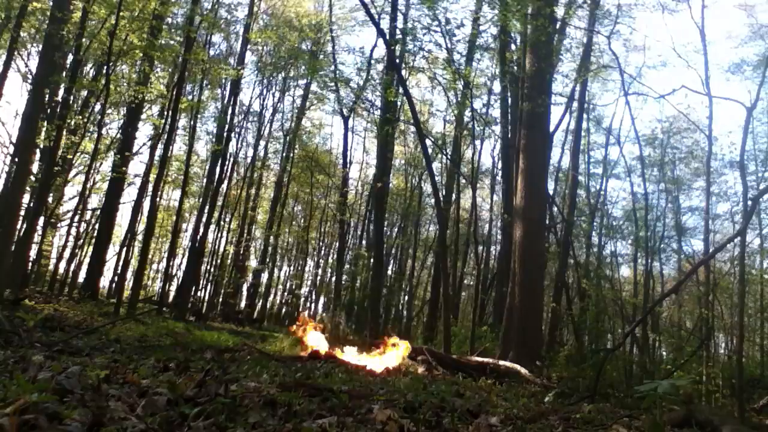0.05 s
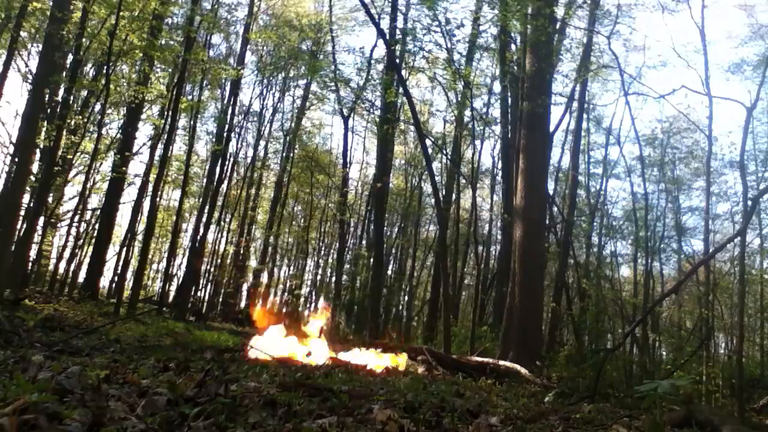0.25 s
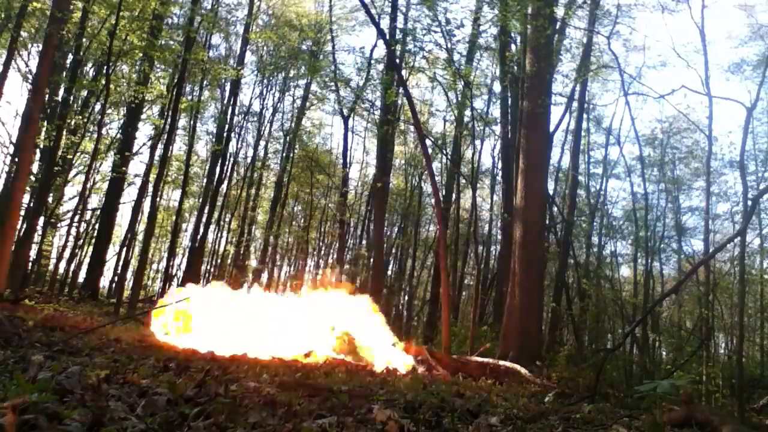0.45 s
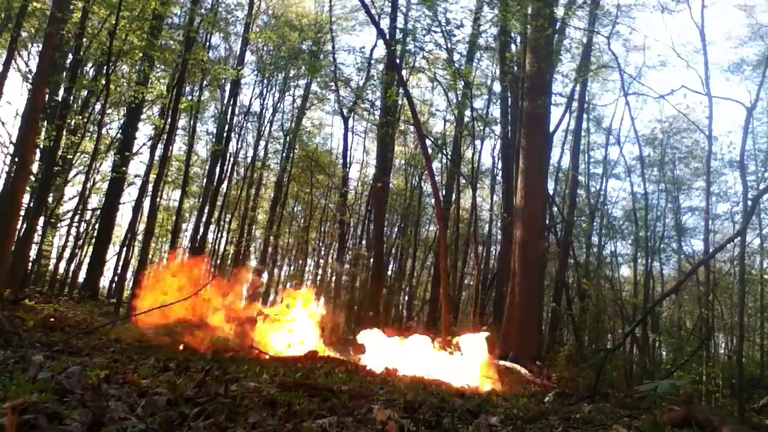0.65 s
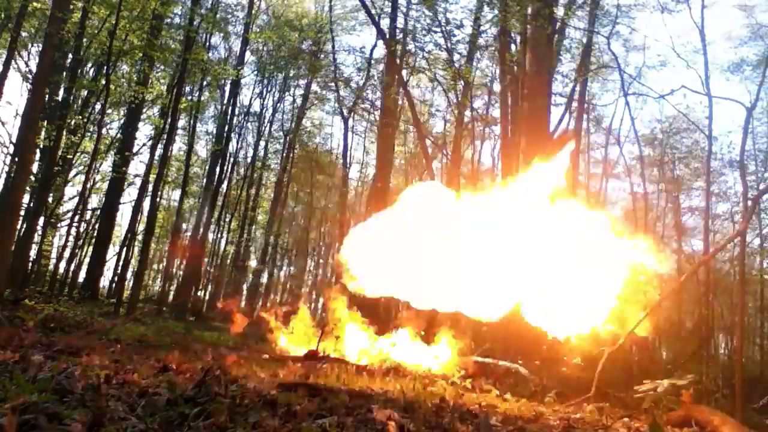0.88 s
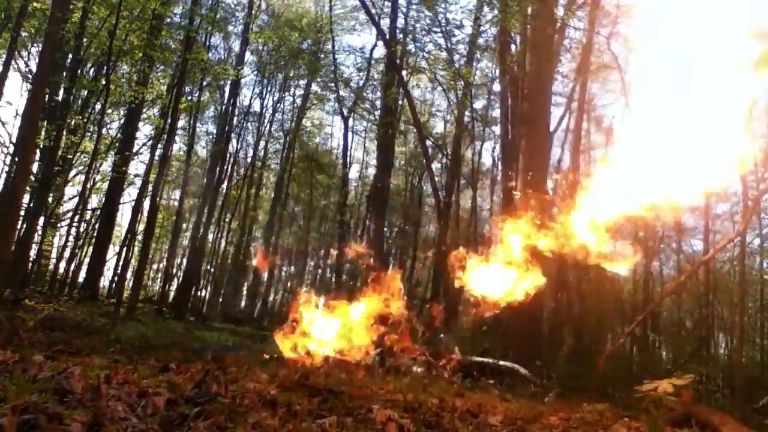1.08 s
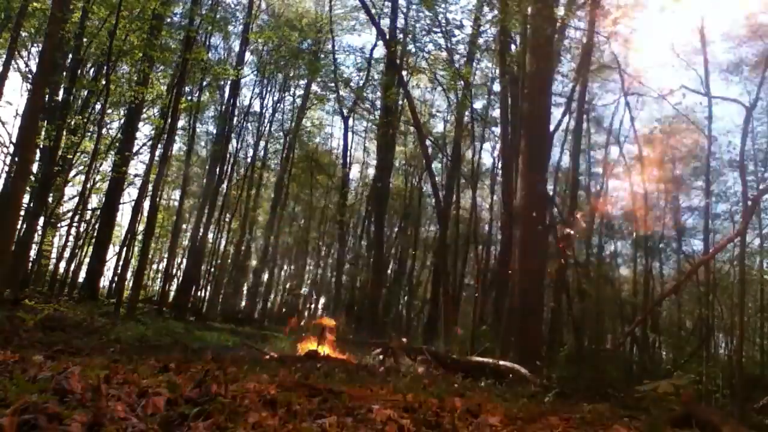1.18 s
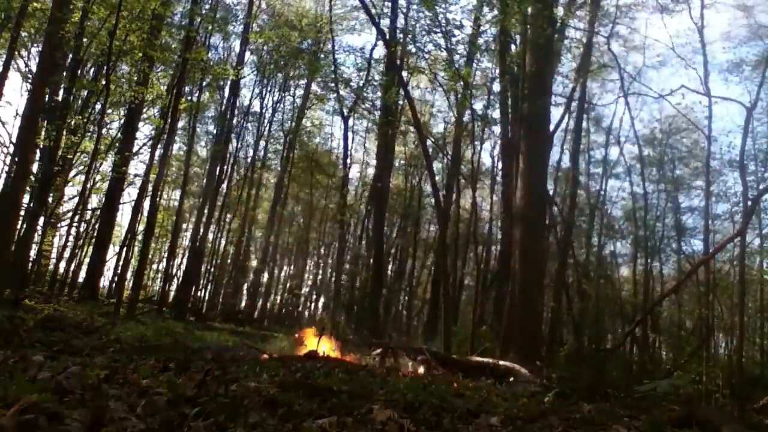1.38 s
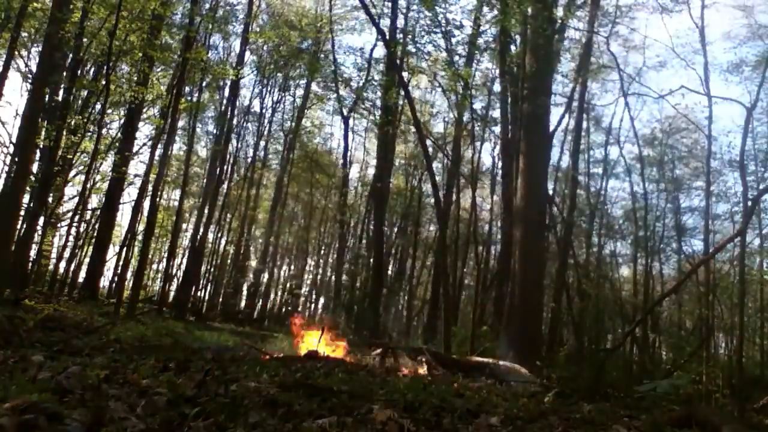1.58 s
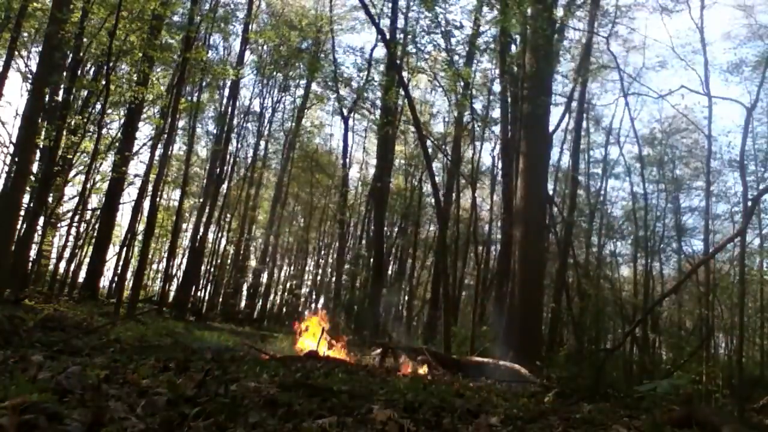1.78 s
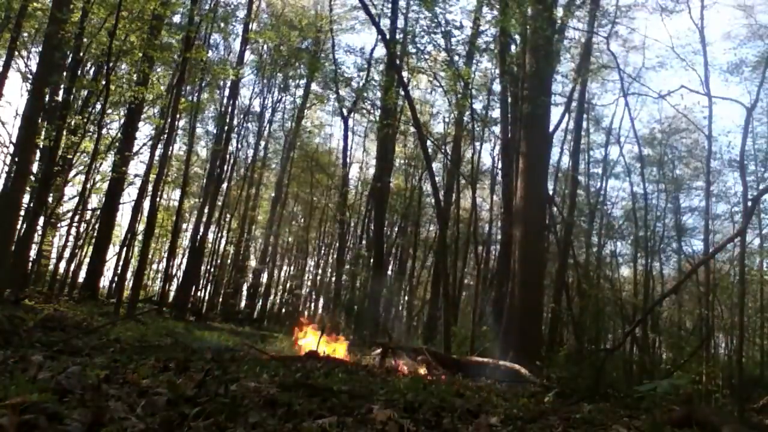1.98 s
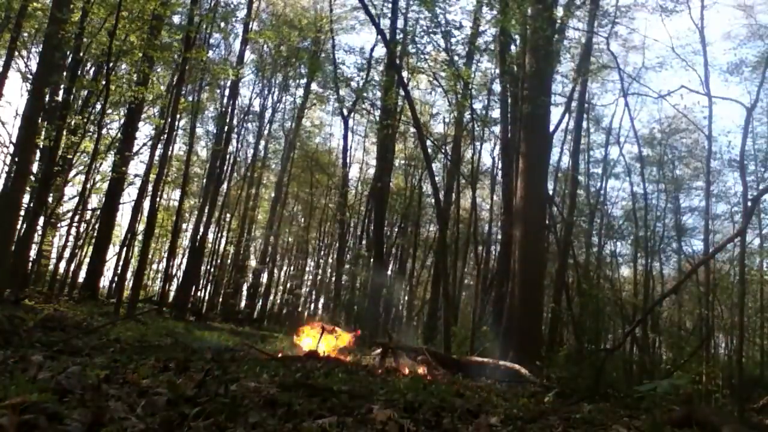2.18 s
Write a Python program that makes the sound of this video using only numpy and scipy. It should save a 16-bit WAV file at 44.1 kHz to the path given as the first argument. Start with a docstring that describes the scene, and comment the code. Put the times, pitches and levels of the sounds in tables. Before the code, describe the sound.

A spray can bursts with a sharp bang at 0.3 seconds, after a faint fire murmur and a few spits. Gas hisses out and ignites in low, thumping surges, swelling into a roaring fireball with a breathy whistle around 1.1 seconds. The flame stops abruptly near 1.4 seconds. Unlit gas keeps hissing in swells, then weakens as the can knocks dully on the forest floor at about 2.1 seconds.

```python
"""A small fire murmurs in a wood, and the aerosol can lying in it hisses and spits at the seam.
The can splits with a sharp bang. Its gas jets out and ignites in thumping surges that swell into
a roaring fireball and go out abruptly. The tumbling can blows off the rest of its gas unlit and
knocks down on the forest floor. Every source is coloured noise shaped by level curves or short puffs."""
import sys
import numpy as np
from scipy import signal
from scipy.fft import rfft, irfft
from scipy.io import wavfile
from scipy.ndimage import uniform_filter1d, map_coordinates

SR = 44100
rng = np.random.default_rng(int(sys.argv[2]) if len(sys.argv) > 2 else 0)


def dump(signal):
    """Clip the signal to [-1, 1] and save it as 16-bit WAV at the path in sys.argv[1]."""
    limited = np.clip(np.atleast_2d(signal).T, -1, 1)
    pcm = np.round(limited * 32767).astype(np.int16)
    wavfile.write(sys.argv[1], SR, pcm)


N = 99225
T = np.arange(N) / SR

# first spits at the seam: start_s, level_db, decay_s
SEAM_SPITS = [(0.2156, -13, 0.0022), (0.2218, -21, 0.005), (0.229, -28, .002)]
# snaps on top of the spits: start_s, level_db
SEAM_SNAPS = [(0.217, -17), (0.2305, -15)]
# tone of the leak, spits, snaps and bang: pitch_hz, gain_db
LEAK_EQ = [(3000, -23), (7000, 1), (9500, -4), (12000, 0), (14000, -1), (16000, -5)]
SPIT_EQ = [(1200, -35), (4000, -20.5), (5400, -9), (6300, -9), (7400, 4.5), (9000, -8), (11500, -11),
           (16000, -15)]
SNAP_EQ = [(3000, -18), (6000, 0), (16000, 0)]
BANG_EQ = [(150, -4), (350, -4), (550, 8), (1000, -5.5), (1400, -21), (3000, -6), (5000, -3.5), (7500, 1),
           (11000, -2), (14200, -11), (16000, -11)]
BURST_S = 0.2725

def rupture():
    """The seam leaks thinly and spits, then tears open with a crackling bang."""
    leak = from_db(-46.5) * (T < BURST_S) * noise(LEAK_EQ)
    spits = sum(from_db(db) * puff(start, .0006, .001, decay) for start, db, decay in SEAM_SPITS)
    spits *= evened(noise(SPIT_EQ), .002)
    bang = from_db(-12) * puff(BURST_S, attack_s=.0014, hold_s=.012, decay_s=.011)
    bang *= noise(BANG_EQ) * turbulence(520, 1.7)
    snaps = sum(from_db(db) * puff(start, .0001, .00027, .0005) for start, db in SEAM_SNAPS)
    snaps *= evened(noise(SNAP_EQ), .001)
    return leak + spits + snaps + bang


# faders for the roar and the flame tongues: time_s, level_db
ROAR_LEVEL = [(0, -28), (.086, -40.5), (.146, -31), (.275, -39), (.29, -28), (.3, -9.5), (.325, -17.5),
              (.355, -16.5), (.4, -28.5), (.456, -39), (.53, -19.5), (.556, -18.5), (.608, -10),
              (.638, -13.5), (.69, -30.5), (.755, -34), (.773, -20.5), (.8, -16), (.858, -9.5),
              (.905, -16.5), (.962, -9), (1.0, -13.5), (1.03, -13.5), (1.08, -23), (1.122, -10.5),
              (1.295, -13.5), (1.33, -24), (1.382, -8.5), (1.4, -18), (1.412, -28), (1.47, -36.5),
              (1.55, -83)]
FLUTTER_LEVEL = [(0, -33.5), (.238, -30.5), (.272, -43), (.286, -21.5), (.298, -13.5), (.32, -22.5),
                 (.352, -21), (.402, -35), (.5, -27.5), (.585, -17), (.67, -29.5), (.72, -25.5),
                 (.764, -28), (.82, -15.5), (.865, -29), (.96, -27.5), (1.05, -32.5), (1.26, -29),
                 (1.398, -30), (1.418, -45), (1.5, -87)]
# the roar deepens as the fireball grows: time_s, pitch_hz
ROAR_GLIDE = [(0, 190), (.3, 169.5), (.45, 192.8), (.55, 135.5), (.64, 169.8), (.78, 154.7), (1.0, 171.2),
              (1.2, 144.3), (1.38, 117.6), (1.5, 140)]
# tone of the roar, flutter and rumble: pitch_hz, gain_db
ROAR_EQ = [(25, -23), (45, -22.5), (75, -4), (150, 2), (240, 1), (330, -8.5), (480, -23.5), (900, -47),
           (1300, -73)]
FLUTTER_EQ = [(100, -20), (250, -8.5), (400, -0.5), (600, -4.5), (850, -9.5), (1060, -16), (1250, -37),
              (2000, -70)]
RUMBLE_EQ = [(25, -52), (60, -29), (100, -9), (150, 0), (200, -11), (280, -21), (450, -27), (1000, -29.5)]
RUMBLE_POWER_DECAY_S = 0.17

def flame():
    """Burning gas billows and flutters, leaving a low rumble to die away among the trees."""
    drive = from_db(curve(ROAR_LEVEL))
    roar = drive * evened(gliding_noise(ROAR_EQ, ROAR_GLIDE), .038)
    flutter = from_db(curve(FLUTTER_LEVEL)) * evened(noise(FLUTTER_EQ), .037)
    pole = np.exp(-1 / (RUMBLE_POWER_DECAY_S * SR))
    tail = np.sqrt(signal.lfilter([1 - pole], [1, -pole], drive ** 2))
    rumble = from_db(-20.5) * tail * evened(noise(RUMBLE_EQ), .071)
    return roar + flutter + rumble


# bass hits under the flame: start_s, level_db, decay_s
IGNITION_THUMPS = [(0.289, -17.5, 0.012), (.545, -12.5, 0.012), (0.764, -15.5, 0.0097),
                   (0.896, -20, 0.0084), (1.36, -17, 0.016)]
# their tone: pitch_hz, gain_db
THUMP_EQ = [(20, -31), (45, -17), (75, 2), (110, 5.5), (170, -3), (300, -53)]

def ignitions():
    """Each fresh cloud of gas catches with a low thump."""
    swell = sum(from_db(db) * puff(start, .007, .0095, decay) for start, db, decay in IGNITION_THUMPS)
    return swell * evened(noise(THUMP_EQ), .021)


# the hiss swells whenever the nozzle turns this way: time_s, level_db (before trim)
HISS_LEVEL = [(0, -39.5), (.08, -45.5), (.2, -39.5), (.268, -41.5), (.3, -25.5), (.36, -29.5), (.41, -33),
              (.48, -35.5), (.525, -32.5), (.545, -26), (.62, -30), (.69, -34.5), (.76, -25), (.89, -23.5),
              (.91, -26), (.945, -24), (.97, -39.5), (1.02, -37), (1.032, -25.5), (1.052, -18.5),
              (1.13, -28), (1.2, -27), (1.27, -32), (1.315, -37), (1.35, -39), (1.44, -37.5), (1.6, -57)]
# whistle accents: start_s, attack_s, hold_s, level_db
JET_WHISTLES = [(0.736, .015, 0.017, -27), (.81, .025, 0.04, -26), (1.172, .07, 0.078, -23)]
# glide shared by hiss and whistle: time_s, pitch_hz
JET_GLIDE = [(0, 7995), (.55, 8210), (.76, 8490), (.86, 7490), (.94, 6893), (1.02, 8440), (1.06, 7523),
             (1.21, 8900), (1.32, 7630), (1.5, 7710)]
# tone of each: pitch_hz, gain_db
HISS_EQ = [(900, -37), (1500, -14), (3000, -11.5), (4300, -6.5), (5500, -6), (7000, -1.5), (8200, 0),
           (10000, -3.5), (12500, -11.5), (16000, -18.5)]
WHISTLE_EQ = [(5200, -28), (6400, -6.5), (7300, -2), (8200, -0.5), (9300, -4.5), (10500, -11.5),
              (12500, -20), (16000, -22)]

def jet(trim_db=0.5):
    """Gas hisses through the tear and at its strongest narrows to a breathy whistle."""
    hiss = from_db(curve(HISS_LEVEL) + trim_db) * gliding_noise(HISS_EQ, JET_GLIDE)
    hiss *= turbulence(80, .89)
    swell = sum(from_db(db) * puff(start, attack, hold, .012) for start, attack, hold, db in JET_WHISTLES)
    return hiss + swell * gliding_noise(WHISTLE_EQ, JET_GLIDE)


# fader for the midrange rush: time_s, level_db (before trim)
RUSH_LEVEL = [(0, -52), (.268, -52), (.285, -31), (.4, -42.5), (.48, -42.5), (.56, -40), (.68, -48),
              (.78, -37.5), (.86, -30.5), (.95, -27), (1.02, -32.5), (1.08, -21), (1.15, -23.5),
              (1.26, -23), (1.35, -27), (1.41, -40.5), (1.55, -41.5)]
# it deepens as the plume spreads: time_s, pitch_hz
RUSH_GLIDE = [(.3, 1699), (.8, 2098), (.95, 1646), (1.08, 1495), (1.2, 1184), (1.38, 1047)]
# its tone: pitch_hz, gain_db
RUSH_EQ = [(400, -13.5), (800, -0.5), (1150, 0), (1400, 0), (1800, -1), (2400, -3.5), (3100, -8.5),
           (4300, -6.5), (5600, -14), (12000, -24)]

def plume(trim_db=-2.5):
    """The plume rushes, flickering as eddies tear at it."""
    rush = from_db(curve(RUSH_LEVEL) + trim_db) * gliding_noise(RUSH_EQ, RUSH_GLIDE)
    return rush * turbulence(rate_hz=68.6, depth_db=2)


# the ground reflection arrives ever later: time_s, delay_ms
BOUNCE_LAG = [(.8, 0.38), (.95, 0.45), (1.055, 0.59), (1.11, 0.69), (1.2, 0.955), (1.3, 1.2)]

def ground_bounce(x):
    """Direct sound plus its reflection off the ground: a comb that sinks as the plume climbs."""
    gain = from_db(-12)
    bounced = map_coordinates(x, [(T - curve(BOUNCE_LAG) / 1000) * SR], order=3)
    return (x + gain * bounced) / np.sqrt(1 + gain ** 2)


def fireball_lift(x, start_s=1.14, end_s=1.438, from_hz=5900, fall_hz_per_s=3600, width_hz=1300):
    """As the fireball lifts, a hollow notch opens in the hiss, sinks and closes again."""
    hz, times, spectrum = signal.stft(x, SR, nperseg=256)
    age = times - start_s
    progress = np.clip(age / (end_s - start_s), 0, 1)
    depth = .6 * np.sqrt(np.abs(np.sin(np.pi * progress)))
    offset = (hz[:, None] - from_hz + fall_hz_per_s * age) / (width_hz / 2)
    return signal.istft(spectrum * (1 - depth / (1 + offset ** 2)), SR)[1][:N]


# fader for the unlit gas: time_s, level_db
VENT_LEVEL = [(1.3, -40), (1.45, -37), (1.53, -29), (1.59, -27), (1.635, -20.5), (1.69, -25), (1.725, -32),
              (1.76, -32), (1.795, -27), (1.818, -19), (1.845, -23), (1.874, -19.5), (1.902, -26),
              (2.0, -28.5), (2.1, -30.5), (2.25, -31)]
# it thins as the can empties: time_s, pitch_hz
VENT_GLIDE = [(1.5, 6550), (1.65, 6734), (1.85, 6835), (2.0, 7174), (2.25, 7410)]
# its tone: pitch_hz, gain_db
VENT_EQ = [(700, -58), (1400, -24.5), (2300, -16), (3200, -14.5), (4200, -8), (5200, -5.5), (6000, -0.5),
           (6700, 2.5), (8200, -3.5), (10100, -12), (11700, -8.5), (13400, -21.5), (14800, -14.5),
           (16000, -22)]

def vent():
    """The last of the gas hisses out of the tumbling can unlit."""
    level = from_db(curve(VENT_LEVEL)) * (T > VENT_LEVEL[0][0])
    return level * gliding_noise(VENT_EQ, VENT_GLIDE) * turbulence(82, .92)


# quick pass-bys of the jet, the last one from the unlit vent: peak_s, half_length_s, level_db (before trim),
# pitch_hz
SWISH_PASSES = [(0.896, 0.014, -26.5, 5450), (0.94, 0.014, -24.5, 2920), (1.064, 0.02, -23.5, 3280),
                (1.843, 0.012, -35.5, 2300)]

def swishes(fall_oct_per_s=48.2, width_oct=0.56, trim_db=-3):
    """A broad band of noise sweeps down each time the jet swings past, and once more as the tumbling can vents
    its unlit gas."""
    out = np.zeros(N)
    for hz in 700 * 2 ** (np.arange(9) / 2):  # half-octave bands
        band = noise([(hz / np.sqrt(2), -20), (hz, 0), (hz * np.sqrt(2), -20)])
        for peak_s, half_length, db, pitch_hz in SWISH_PASSES:
            offset_oct = np.log2(hz / pitch_hz) + fall_oct_per_s * (T - peak_s)
            swell = np.exp(-.5 * (((T - peak_s) / half_length) ** 2 + (offset_oct / width_oct) ** 2))
            out += band * from_db(db + trim_db) * swell
    return out


# resonances of the shell: pitch_hz, width_hz, gain_db
SHELL_MODES = [(1192, 14, -5), (1260, 27, -5), (1540, 30, -6.5), (1740, 20, -6.5), (2085, 25, -5)]

def can_ring(gas):
    """The hollow can rings faintly in the gas stream."""
    out = np.zeros(N)
    for hz, width_hz, db in SHELL_MODES:
        r = np.exp(-np.pi * width_hz / SR)
        feedforward = np.array([1, 0, -1]) * (1 - r * r) / 2
        feedback = [1, -2 * r * np.cos(2 * np.pi * hz / SR), r * r]
        out += from_db(db) * signal.lfilter(feedforward, feedback, gas)
    return out


# the can touches down: start_s, level_db, decay_s
KNOCKS = [(2.068, -38, 0.0099), (2.104, -31, 0.0045), (2.118, -25.5, 0.015), (2.145, -36, 0.016)]
# tone of the knocks: pitch_hz, gain_db
KNOCK_EQ = [(80, -17), (270, 0), (560, -4.5), (770, 7), (980, -13), (1280, -1), (1800, -14), (2200, -8),
            (9000, -39)]

def landing():
    """The empty can knocks dully, damped by leaves and soil."""
    hits = sum(from_db(db) * puff(start, .00087, .00091, decay) for start, db, decay in KNOCKS)
    return hits * evened(noise(KNOCK_EQ), .0053)


# slapback taps: delay_s, level_db
TRUNK_ECHOES = [(.021, -23), (.067, -18)]

def trees(x):
    """Nearby trunks throw back faint echoes."""
    return sum(from_db(db) * np.interp(T - delay, T, x, left=0) for delay, db in TRUNK_ECHOES)


# tone of the background bed: pitch_hz, gain_db
AIR_EQ = [(25, -45), (70, 3), (145, 6.5), (280, -10.5), (480, -4), (780, -14), (1050, -23), (1500, -7),
          (1900, -7.5), (2800, 2), (5000, -2), (12000, -33)]

def air(fade_in_s=0.48):
    """A soft wash fills the wood once the can has burst."""
    return from_db(-42.5) * np.clip((T - BURST_S) / fade_in_s, .1, 1) * noise(AIR_EQ)


def from_db(db):
    """Decibels to gain."""
    return 10 ** (np.asarray(db) / 20)


def curve(rows):
    """Automation: straight lines between points in time."""
    return np.interp(T, *np.transpose(rows))


def noise(eq, size=N):
    """Noise at rms 1, shaped by an EQ curve and falling 20 dB an octave beyond its ends."""
    hz, db = np.transpose(eq)
    octave = np.log2(np.maximum(np.fft.rfftfreq(size, 1 / SR), 1))
    outside = np.abs(octave - np.clip(octave, np.log2(hz[0]), np.log2(hz[-1])))
    gain = from_db(np.interp(octave, np.log2(hz), db) - 20 * outside)
    x = irfft(rfft(rng.standard_normal(size)) * gain, size)
    return x / x.std()


def gliding_noise(eq, glide):
    """Noise played at varying speed, so that its EQ peak follows the glide."""
    peak_hz = max(eq, key=lambda point: point[1])[0]
    position = np.cumsum(curve(glide) / peak_hz)
    return map_coordinates(noise(eq, size=2 * N), [position], order=3, mode="wrap")


def evened(x, window_s):
    """Takes the slow swings out of a noise, leaving its fast grain."""
    size = max(int(window_s * SR), 8)
    return x / np.sqrt(uniform_filter1d(uniform_filter1d(x * x, size), size) + 1e-9)


def turbulence(rate_hz, depth_db):
    """A randomly wavering gain."""
    r = np.exp(-2 * np.pi * rate_hz / SR)
    slow = signal.lfilter([1], [1, -2 * r, r * r], rng.standard_normal(2 * N))[N:]
    return from_db(depth_db * slow / slow.std())


def puff(start_s, attack_s, hold_s, decay_s):
    """Envelope: linear rise, hold, exponential fall."""
    age = T - start_s
    return np.clip(age / attack_s, 0, 1) * np.exp(-np.maximum(age - attack_s - hold_s, 0) / decay_s)


def scene():
    """Can, gas and flame in the wood, mixed to mono."""
    hits = rupture() + landing()
    hiss = jet()
    rush = ground_bounce(plume())
    unlit = vent()
    gas = fireball_lift(hiss + rush) + unlit + can_ring(rush + unlit)
    return (hits + trees(hits) + gas + swishes() + flame() + ignitions() + air())[None]


def record(dry, ceiling=0.79, cutoff_hz=15800):
    """A soft clip rounds the peaks and a steep low-pass cuts the top."""
    rounded = dry / (1 + (dry / ceiling) ** 6) ** (1 / 6)
    return signal.sosfilt(signal.ellip(10, .1, 90, cutoff_hz, fs=SR, output="sos"), rounded)


dry = scene()
out = record(dry)
dump(out)
```